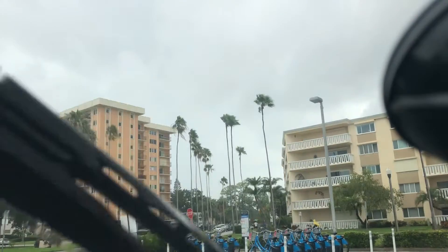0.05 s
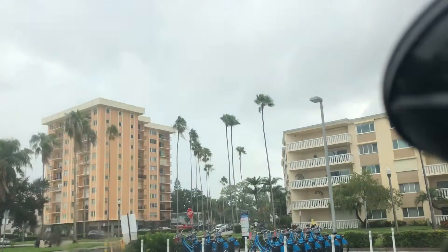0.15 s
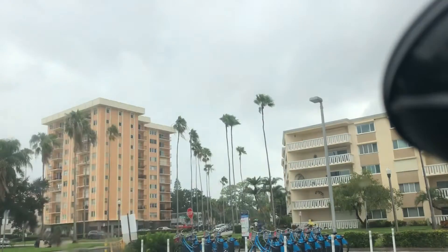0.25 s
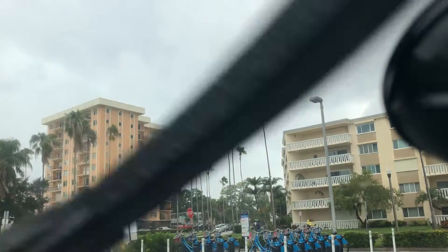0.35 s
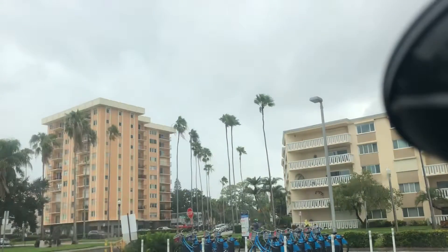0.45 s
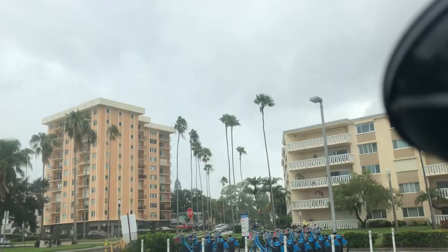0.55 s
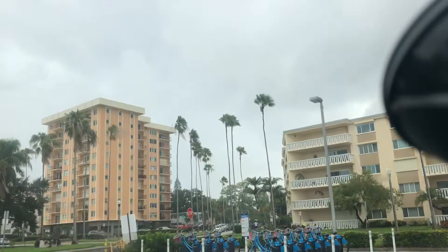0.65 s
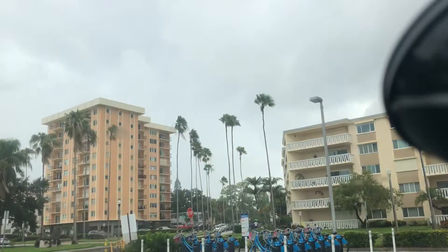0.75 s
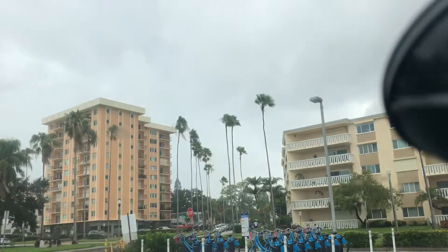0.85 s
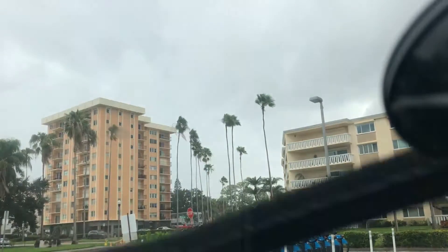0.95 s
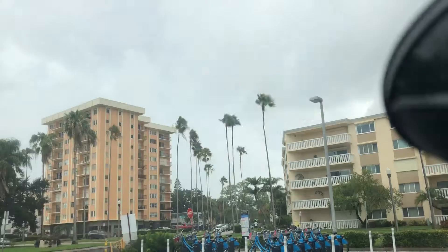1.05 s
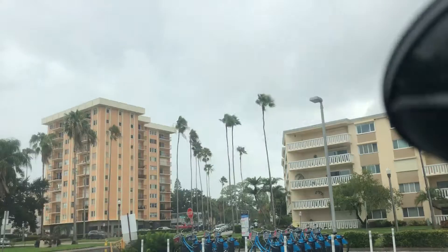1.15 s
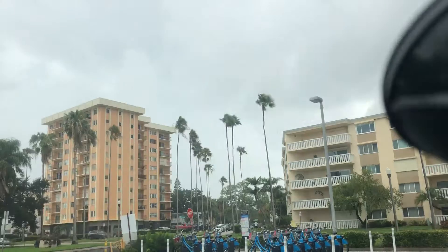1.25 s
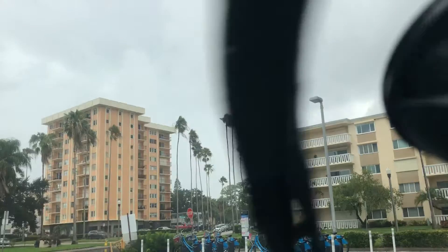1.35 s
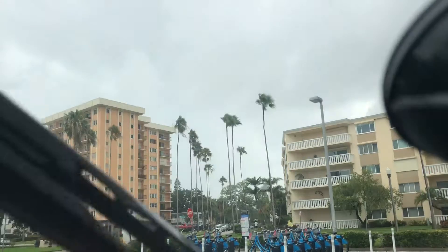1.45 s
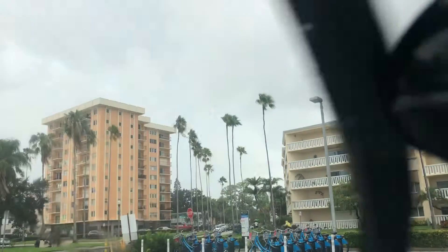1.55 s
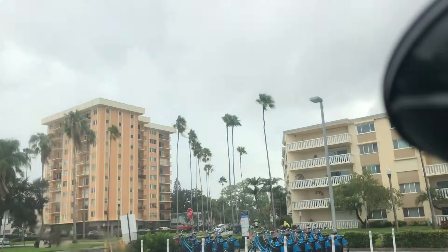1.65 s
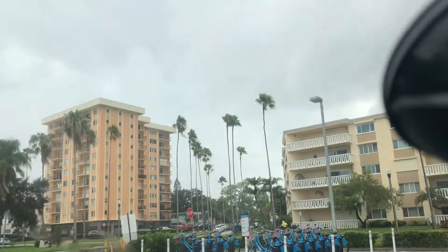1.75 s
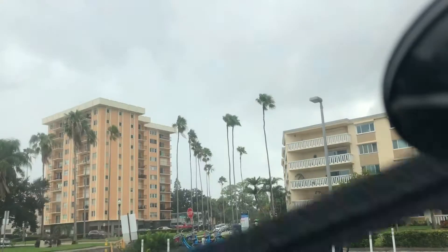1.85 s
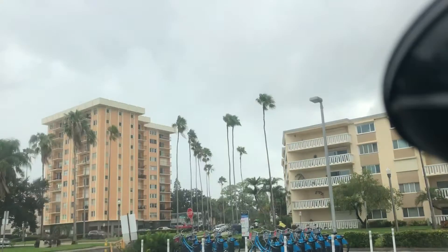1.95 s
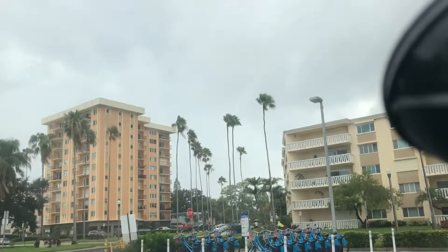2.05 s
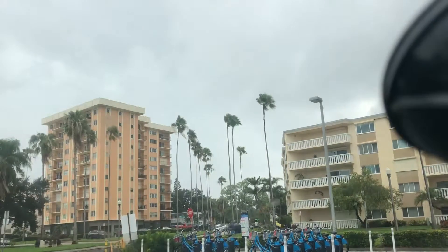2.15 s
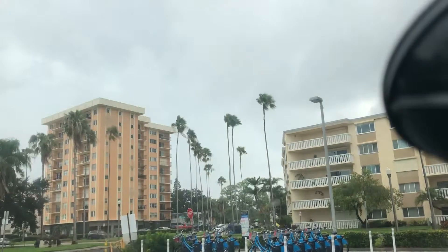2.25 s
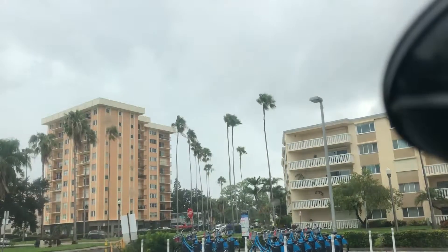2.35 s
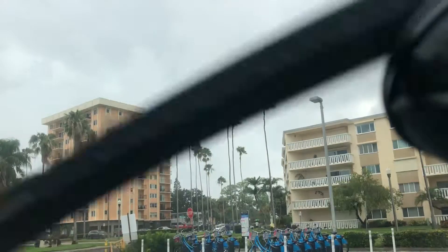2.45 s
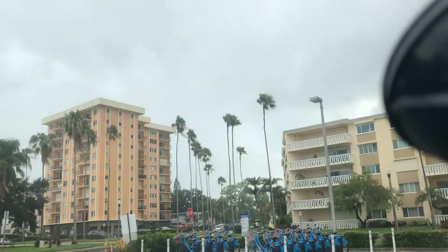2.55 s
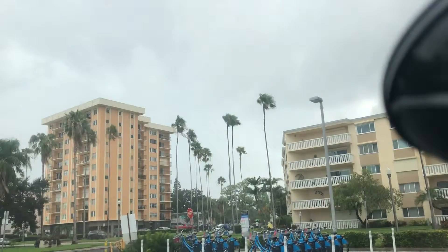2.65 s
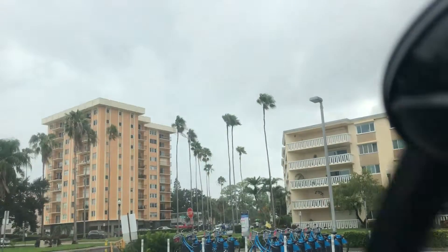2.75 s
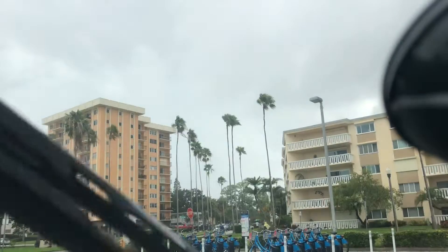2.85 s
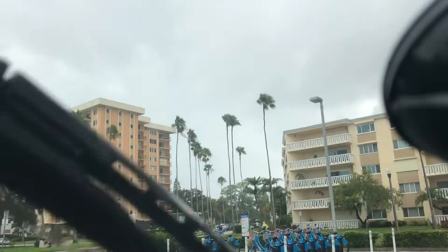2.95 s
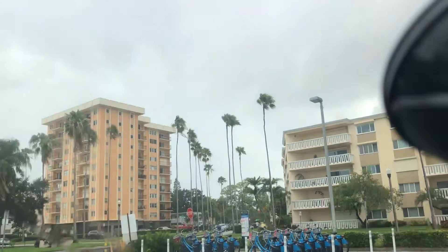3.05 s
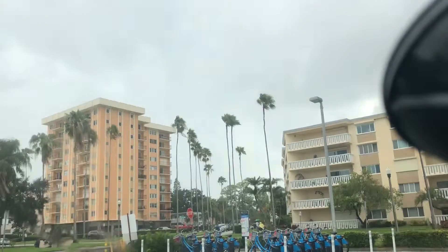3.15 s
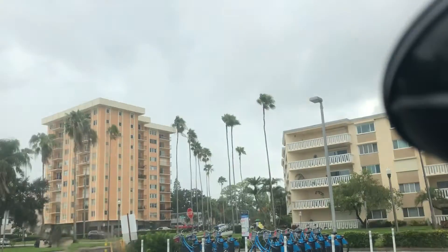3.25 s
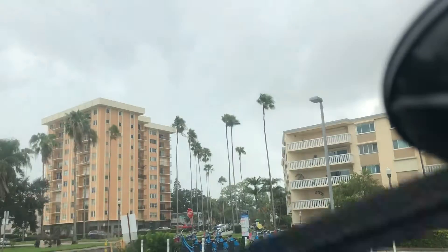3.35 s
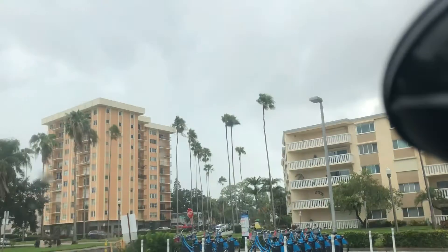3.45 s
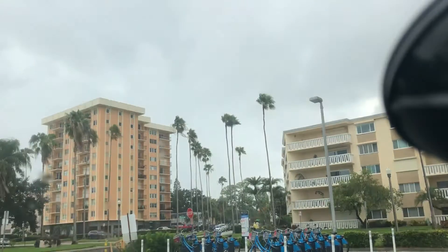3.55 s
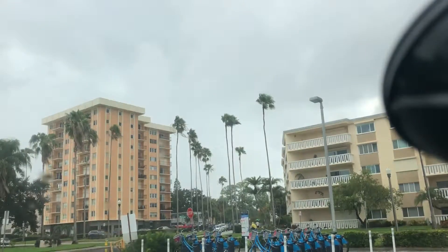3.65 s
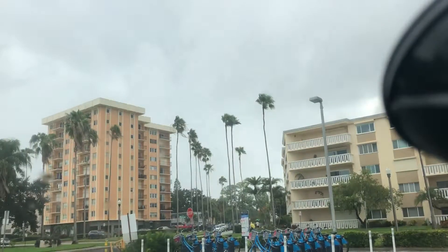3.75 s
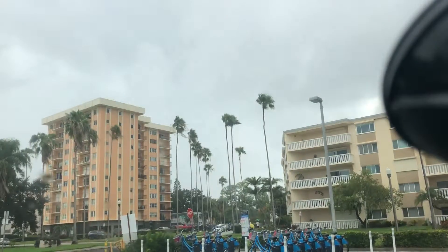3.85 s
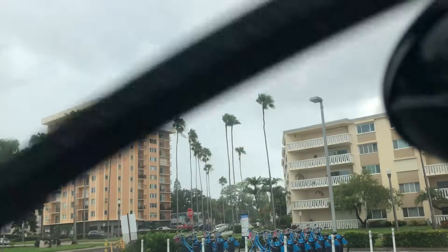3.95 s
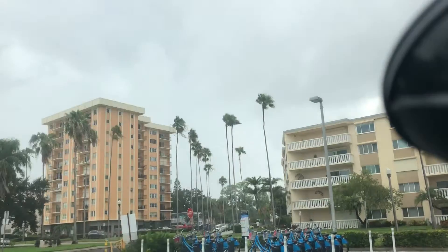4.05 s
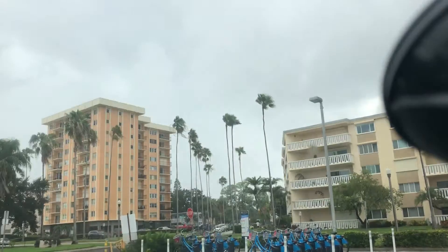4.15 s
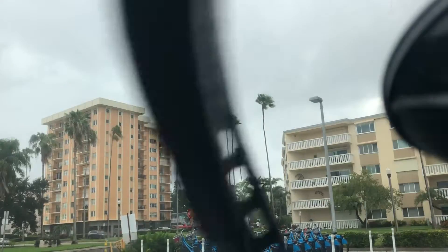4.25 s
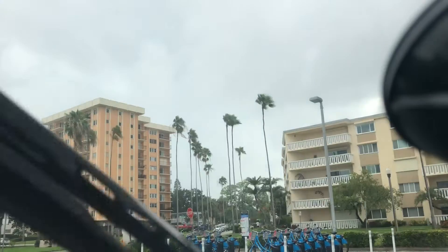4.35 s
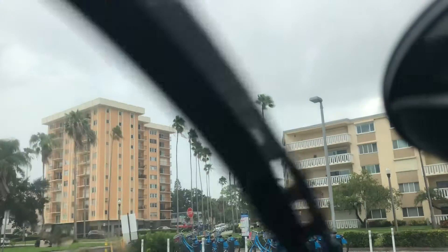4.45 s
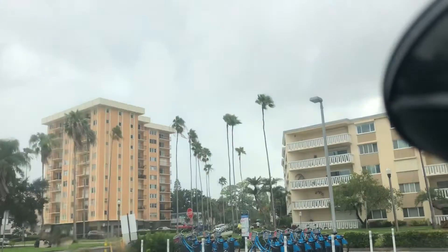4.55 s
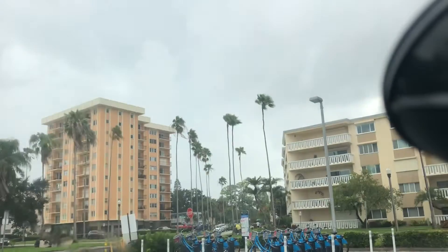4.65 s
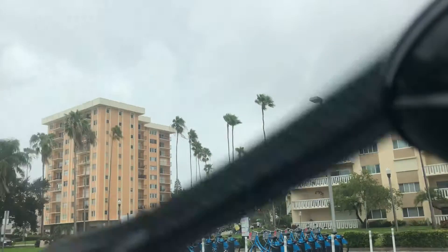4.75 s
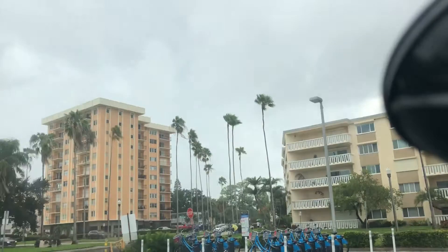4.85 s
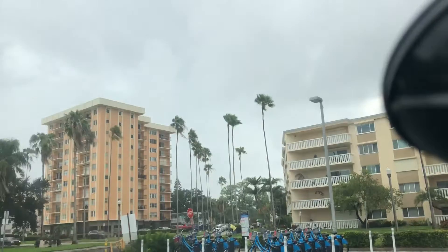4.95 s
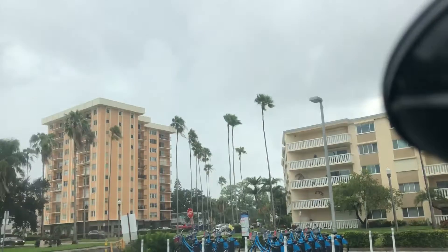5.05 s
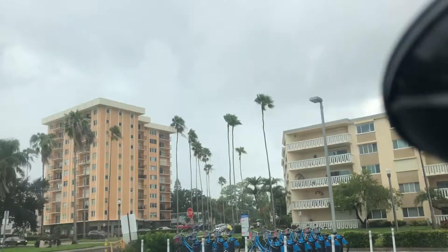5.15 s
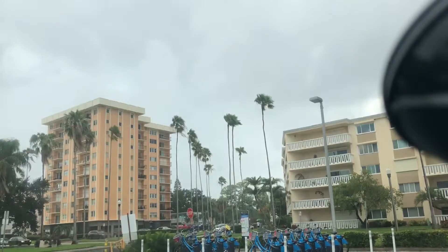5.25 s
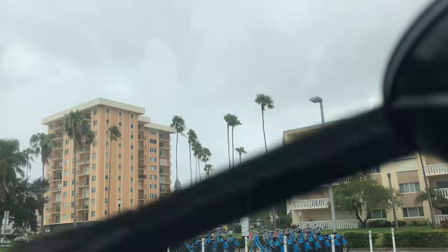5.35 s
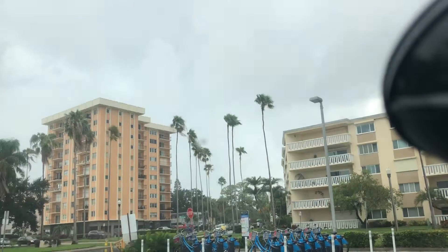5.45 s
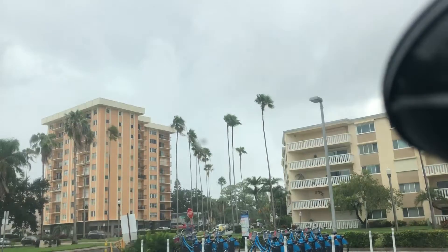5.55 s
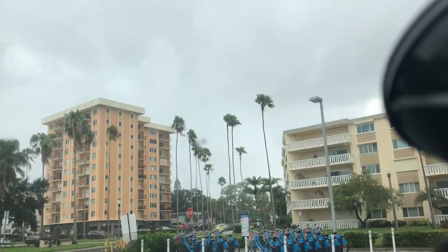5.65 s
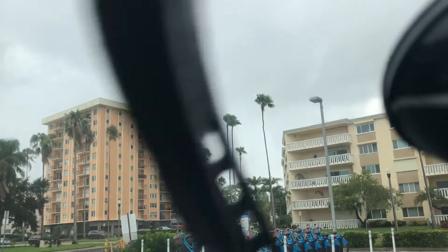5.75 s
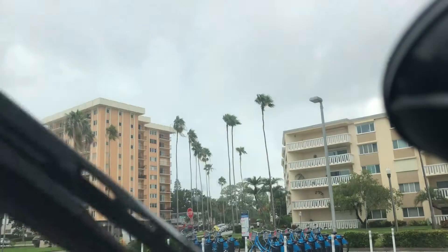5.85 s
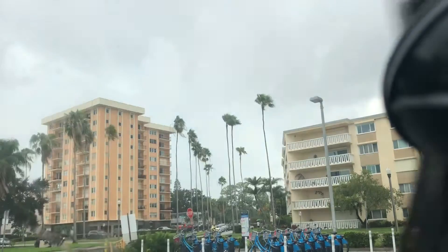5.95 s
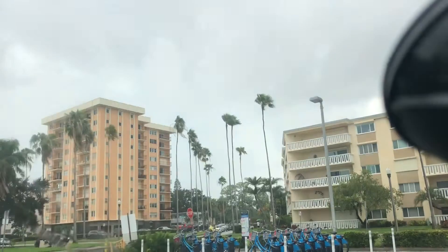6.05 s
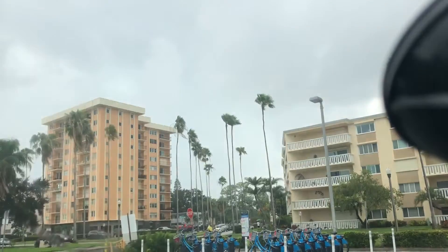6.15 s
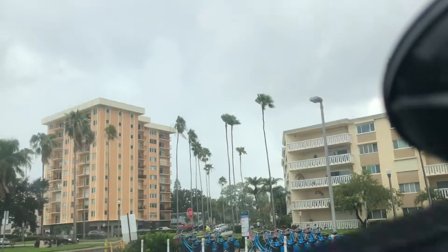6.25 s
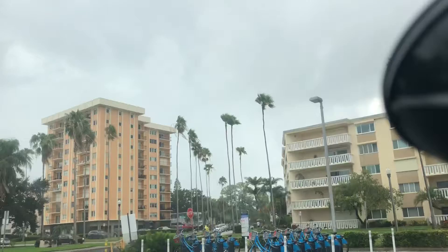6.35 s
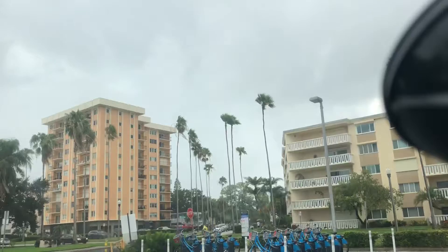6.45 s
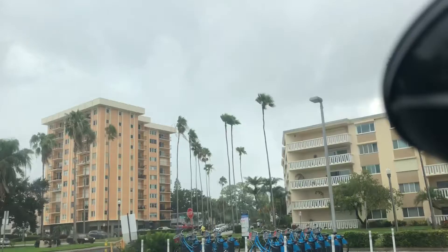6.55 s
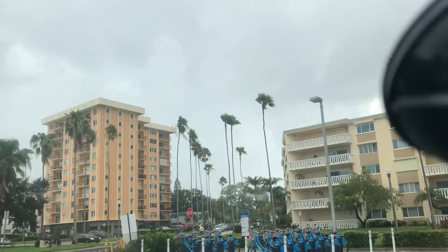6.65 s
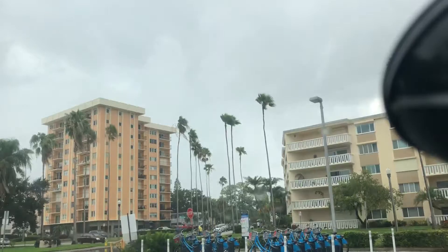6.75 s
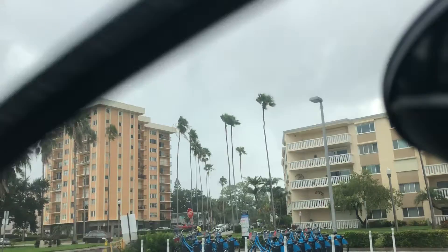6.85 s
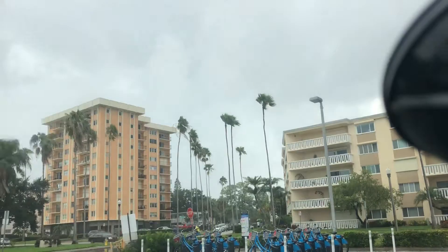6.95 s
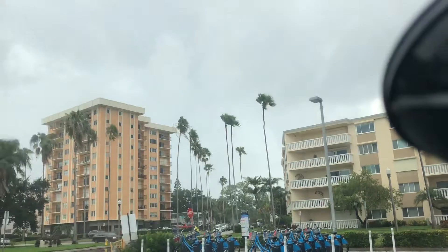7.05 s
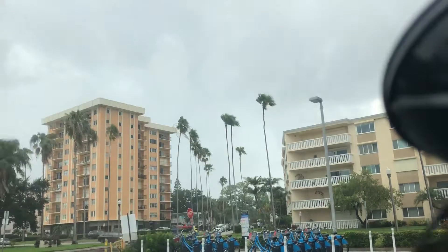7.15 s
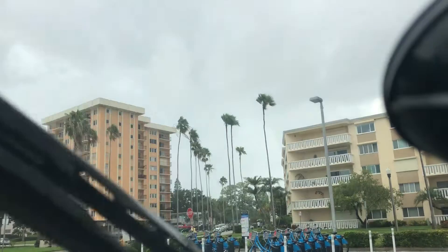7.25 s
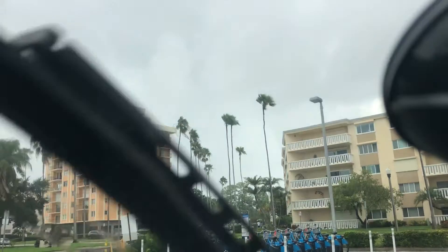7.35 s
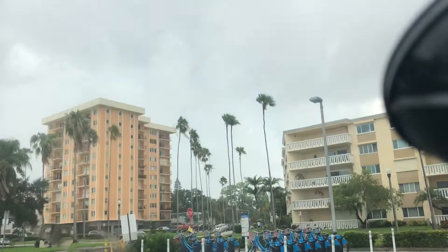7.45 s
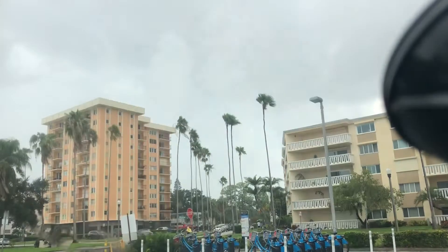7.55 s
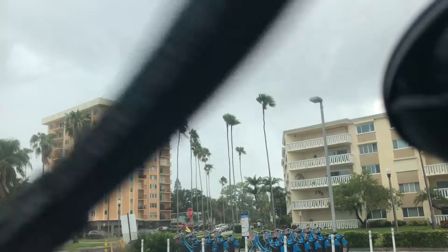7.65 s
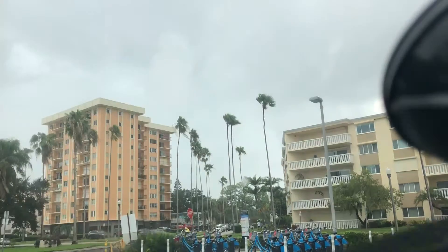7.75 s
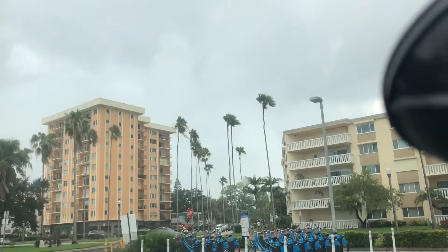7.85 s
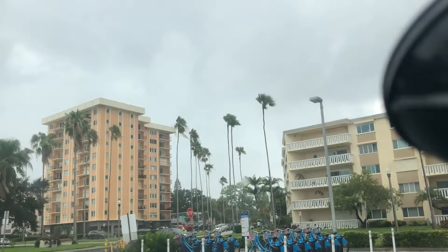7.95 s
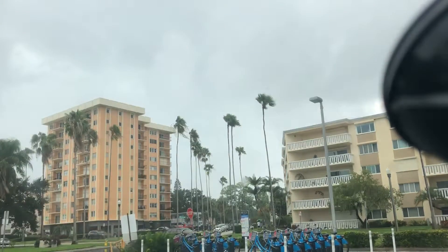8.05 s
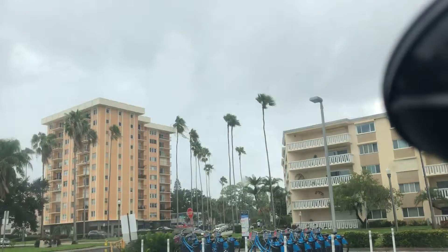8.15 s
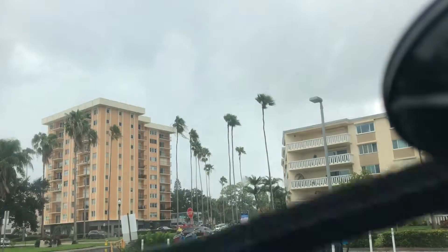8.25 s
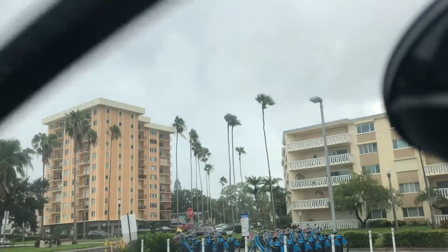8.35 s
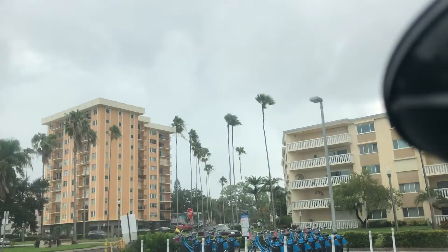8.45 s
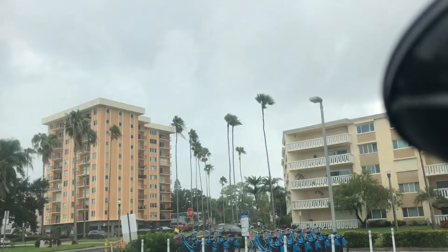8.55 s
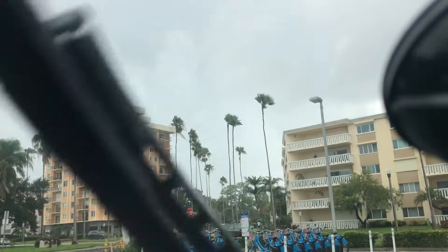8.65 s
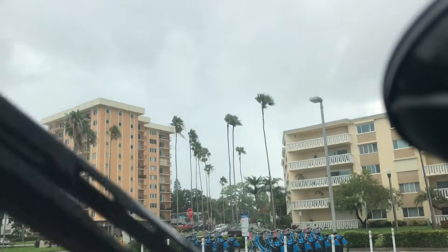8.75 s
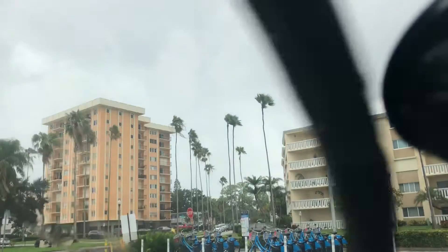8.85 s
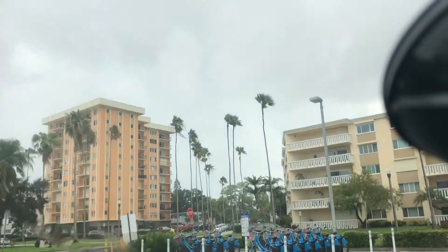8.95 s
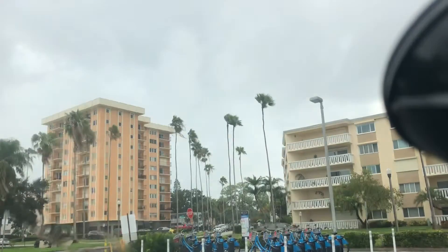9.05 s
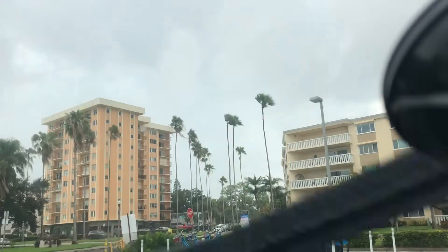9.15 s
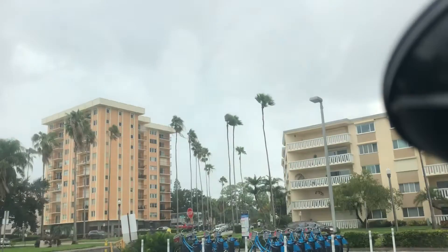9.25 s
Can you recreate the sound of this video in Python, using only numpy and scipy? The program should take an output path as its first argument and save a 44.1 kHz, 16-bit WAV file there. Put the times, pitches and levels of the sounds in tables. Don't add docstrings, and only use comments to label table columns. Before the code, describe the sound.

Heard from inside a parked car on a phone microphone: fast wipers turn at each end of their sweep. A soft rubber flip leads into a heavy, hollow low knock, then a lighter knock follows with squeaky stuttering judder and a small click. The pair repeats about every one and a half seconds over engine rumble, faint blower hiss and light drizzle.

```python
import sys
import numpy as np
from scipy import signal
from scipy.fft import rfft, irfft
from scipy.io import wavfile
from scipy.ndimage import uniform_filter1d

SR = 44100
rng = np.random.default_rng(int(sys.argv[2]) if len(sys.argv) > 2 else 0)


def dump_mix(stems):
    frames = np.atleast_2d(stems).T
    limited = np.clip(frames, -1, 1)
    pcm = np.round(limited * 32767).astype(np.int16)
    wavfile.write(sys.argv[1], SR, pcm)


def invert_db(x):
    u = np.asarray(x, float) / 20
    return 10 ** u


N = 410130

# pitch_hz, density_db_per_hz
CABIN_SPECTRUM = [(12, -36), (20, -2), (81, 0), (120, -2.5), (198, -5.5), (247, -7.5), (318, -12.5),
                  (587, -41.5), (639, -21.5), (734, -22.5), (918, -23.5), (1180, -30), (3050, -32),
                  (6860, -42), (15900, -69.5)]
# pitch_hz, width_hz, level_db
MOTOR_PANELS = [
    (36.3, 7.7, -52.5),
    (76.1, 19, -55),
    (200.7, 16, -53.5),
    (332, 31, -64),
    (618, 59, -65),
    (878, 100, -67),
    (9000, 980, -85.5),
]
# time_s, flow_db, drizzle_db
WEATHER = [(0, .4, 5), (.5, 0.9, -1), (1.6, -0.4, 6), (2.1, -0.5, 2), (2.6, -0.5, 6), (3.8, -0.3, 1.5),
           (4.9, 0, -1), (6.0, 0.9, 0.5), (7.2, 2, -2), (7.8, 1.3, -5), (8.6, 0.6, -3), (9.3, -0.1, -3)]
# start_s, level_db
DROPS = [
    (2.556, -54),
    (2.7595, -61),
    (3.9694, -56),
    (7.737, -48),
    (9.203, -45),
]

# start_s, blow_db
HEAVY_KNOCKS = [
    (0.1162, 0),
    (1.582, 0),
    (3.0446, 1),
    (4.5051, 1),
    (5.9652, -1),
    (7.4272, 1),
    (8.8866, 2),
]
# start_s, blow_db
LIGHT_KNOCKS = [
    (0.7347, 0),
    (2.1977, 0),
    (3.6581, 0),
    (5.1183, 0),
    (6.5799, 0),
    (8.0404, 0),
]
# start_s, snap_db
LEAD_SNAPS = [
    (0.0138, -37.5),
    (1.4787, -36),
    (2.9389, -35),
    (4.3983, -34.5),
    (5.8641, -35),
    (7.3211, -35),
    (8.7803, -34.5),
]
# start_s, snap_db
TRAIL_SNAPS = [
    (0.854, -32),
    (2.3145, -35.5),
    (3.7756, -33),
    (5.236, -35),
    (6.6984, -34),
    (8.158, -32),
]
# start_s, blow_db
FLIPS = [
    (0.0227, 3),
    (1.4876, 0.5),
    (2.9489, 1),
    (4.4092, 0),
    (5.8728, 0.5),
    (7.3317, 0),
    (8.7909, 1.5),
]
# start_s, level_db
LATCH_CLICKS = [
    (0.8704, -36),
    (2.3346, -52),
    (3.7948, -40),
    (5.2565, -40),
    (6.7176, -39),
    (8.1768, -42),
]
# start_s, level_db
CREAKS = [(1.417, -57), (2.878, -53), (4.3374, -58), (5.1476, -53), (5.8024, -57), (6.6094, -53),
          (7.2594, -57), (8.72, -58)]

# pitch_hz, level_db, t60_s, swing_sign (+1 out, -1 in)
HEAVY_MODES = [(46.2, -32.4, 0.33, 1), (82.5, -27.8, 0.33, -1), (90.5, -30.7, 0.33, 1),
               (114.4, -17.5, 0.33, 1), (142.4, -20.5, 0.278, 1), (170.6, -17.5, 0.184, -1),
               (197.4, -28.8, 0.279, -1), (216.0, -11.2, 0.044, 1), (241.8, -7.9, 0.07, 1),
               (285.1, -15.0, 0.09, 1), (310.1, -7.4, 0.04, -1), (334.4, -23.7, 0.105, 1),
               (489.5, -27.6, 0.043, 1), (583.4, -26.2, 0.057, 1)]
LIGHT_MODES = [(40.7, -42, 0.33, 1), (82, -30, 0.37, 1), (129, -30.5, 0.32, 1), (154.6, -34, 0.59, 1),
               (181.1, -20.5, 0.14, -1), (210, -29.0, 0.37, -1), (239.7, -26.5, 0.15, 1),
               (293, -34.5, 0.25, 1), (333, -35.5, 0.23, -1), (412, -32, 0.069, 1), (469, -36.5, 0.075, -1),
               (526, -28.5, 0.023, 1)]
FLIP_MODES = [(49.5, -26.2, 0.02, 1), (88.6, -30.1, 0.3, -1), (115.2, -30.5, 0.3, -1),
              (133.4, -24.5, 0.189, 1), (156.2, -28.7, 0.162, -1), (180.0, -35.2, 0.103, 1),
              (240.9, -30.7, 0.087, 1), (256.5, -33.0, 0.103, 1), (304.5, -42.0, 0.179, -1),
              (383.2, -30.1, 0.039, 1), (551.7, -70.1, 0.3, -1)]
# pitch_hz, level_db, t60_s, swing_sign
DOOR_MODES = [
    (118, -33.5, .7, -1),
    (93, -35, .5, -1),
]

# delay_s, length_s, pitch_hz, width_hz, level_db
HEAVY_RUBS = [(-.042, 0.051, 3200, 1400, -57.5), (-.038, 0.051, 610, 480, -44.5),
              (-.007, 0.012, 5000, 6500, -56), (-.005, 0.013, 2200, 1300, -46),
              (-.006, 0.024, 4700, 1500, -52.5), (-.003, 0.02, 9500, 790, -67),
              (-.008, 0.027, 910, 317, -45.5), (-.005, .011, 1370, 420, -50.5),
              (-.002, 0.054, 397, 220, -41), (0.019, 0.08, 570, 60, -56)]
LEAD_RUBS = [(-.033, 0.03, 4270, 1000, -49.5), (-0.034, 0.041, 5120, 310, -54),
             (-.025, 0.013, 8500, 6800, -59), (-.003, 0.0098, 4080, 1200, -43),
             (0.0059, .007, 9300, 2600, -62), (.004, 0.044, 4380, 950, -56.5),
             (0.019, 0.017, 5300, 600, -53.5), (.011, .028, 7400, 6800, -57.5),
             (-0.0098, 0.055, 3850, 2400, -53), (.008, 0.034, 1950, 950, -57),
             (.005, 0.031, 560, 400, -47.5), (-.062, 0.036, 390, 360, -50), (-.045, 0.061, 145, 80, -43.5),
             (-.032, 0.053, 770, 390, -54.5), (-0.021, 0.0089, 2130, 900, -56),
             (.032, 0.035, 290, 320, -51.5)]
LIGHT_RUBS = [(-.011, 0.01, 4700, 7300, -48.5), (-.007, 0.012, 4720, 1150, -44),
              (-.007, 0.018, 2500, 7200, -54.5), (-0.0051, 0.025, 3500, 2500, -54),
              (0.003, .008, 8200, 3000, -76), (-.010, 0.021, 670, 530, -42.5),
              (0.0015, 0.063, 354, 290, -45), (-.006, 0.0068, 2100, 1200, -47.5)]
TRAIL_RUBS = [(-.037, 0.018, 4570, 560, -56.5), (-.020, 0.014, 4420, 630, -52),
              (-0.038, 0.03, 3760, 820, -54.5), (-.039, 0.05, 3500, 2000, -54),
              (-.032, 0.029, 1330, 150, -45.5), (-.005, 0.016, 1430, 400, -51.5),
              (-0.041, 0.035, 550, 490, -40), (-.039, 0.08, 314, 200, -34), (-.002, .013, 3530, 1100, -41),
              (.008, 0.02, 2760, 1400, -52)]
LATCH_RUBS = [
    (-.0005, .0035, 4800, 4200, -46),
    (-.0005, .004, 13500, 1200, -65),
    (-.005, .013, 820, 260, -38),
    (.002, .015, 4500, 4000, -60),
    (-.008, .04, 125, 60, -31),
]
CREAK_RUBS = [
    (-.002, 0.011, 4500, 4700, -56.5),
]

# delay_s, level_db, push_sign (+1 push, -1 pull)
HEAVY_JOLTS = [
    (-.0345, -16, 1),
    (-.0163, -12, 1),
    (-.010, -12, 1),
]
LEAD_JOLTS = [
    (-.0598, -14, -1),
    (-.035, -19, 1),
    (-.0193, -19, -1),
]
TRAIL_JOLTS = [
    (-.0383, -12, -1),
    (-.0341, -13, -1),
    (-.0171, -6.6, 1),
    (-.0085, -10.4, 1),
    (.0005, -3, 1),
    (.0083, -11, 1),
    (.017, -9, 1),
    (.0288, -5.4, -1),
    (.0345, -12.3, -1),
]


def add(track, start_s, sound):
    at = int(round(start_s * SR)) + np.arange(len(sound))
    inside = (at >= 0) & (at < N)
    track[at[inside]] += sound[inside]


def band(size, pitch_hz, width_hz, order=2):
    f_hz = np.arange(size // 2 + 1) * SR / size + 1e-9
    detune = (f_hz - pitch_hz * pitch_hz / f_hz) / width_hz
    gain = 1 / (1 + detune ** 2) ** (order / 2)
    noise = irfft(rfft(rng.standard_normal(size)) * gain, size)
    return noise / np.std(noise)


def walk(rate_hz):
    hold = int(SR / rate_hz)
    held = np.repeat(rng.standard_normal(N // hold + 1), hold)
    smooth = uniform_filter1d(uniform_filter1d(held, hold), hold)
    return 1.3 * smooth[:N]


def shudder(events, swell_db, rise_s, fall_s):
    since_s = np.arange(N) / SR - np.array(events)[:, :1]
    climb = np.clip(1 + since_s / rise_s, 0, 1)
    fall = np.exp(-np.maximum(since_s, 0) / fall_s)
    return swell_db * np.sum(climb * fall, axis=0)


def motor_hum():
    out = np.zeros(N)
    for pitch_hz, width_hz, level_db in MOTOR_PANELS:
        out += invert_db(level_db + 1.7 * walk(4.7)) * band(N, pitch_hz, width_hz)
    return out


def cabin_noise():
    time_s, flow_db, drizzle_db = np.transpose(WEATHER)
    now_s = np.arange(N) / SR
    hiss_db = np.interp(now_s, time_s, flow_db)
    spray_db = np.interp(now_s, time_s, drizzle_db)
    rumble_db = -2.5 + shudder(HEAVY_KNOCKS, swell_db=3.8, rise_s=0.15, fall_s=0.064)
    rumble_db += shudder(TRAIL_SNAPS, swell_db=8.1, rise_s=0.072, fall_s=0.068)
    spectrum_hz, density_db = np.transpose(CABIN_SPECTRUM)
    out = np.zeros(N)
    for hz in 28 * 2 ** np.arange(0, 9.6, .5):
        high = np.clip(np.log2(hz / 250) / 2, 0, 1)
        air_db = hiss_db if hz < 9500 else spray_db
        level_db = np.interp(np.log(hz), np.log(spectrum_hz), density_db) + 10 * np.log10(hz) - 68
        level_db = level_db + (1 - high) * rumble_db + high * air_db
        level_db = level_db + (1.8 - 0.94 * high) * walk(11)
        out += invert_db(level_db) * band(N, hz, hz / 1.61)
    return out


def raindrops():
    out = np.zeros(N)
    decay = np.exp(-np.arange(1024) / SR / 0.0034)
    for start_s, level_db in DROPS:
        add(out, start_s, invert_db(level_db - 13) * decay * band(1024, 11500, 8000))
    return out


def ring(modes, damping=1, bloom_s=.001):
    pitch_hz, level_db, t60_s, swing = np.transpose(modes)
    t_s = np.arange(SR // 2)[:, None] / SR
    rise_s = np.where(pitch_hz < 150, bloom_s, .001)
    contact = 1 - np.exp(-t_s / rise_s)
    decay = np.exp(-np.log(1000) * damping * t_s / t60_s)
    return swing * invert_db(level_db) * np.sin(2 * np.pi * pitch_hz * t_s) * decay * contact


def knocks(events, modes, scatter_db, bloom_s=.001):
    out = np.zeros(N)
    rings = ring(modes, 0.98, bloom_s)
    for start_s, blow_db in events:
        strength = invert_db(scatter_db * rng.standard_normal(len(modes)))
        add(out, start_s, invert_db(blow_db) * rings @ strength)
    return out


def squeak(length_s, pitch_hz, width_hz):
    u = np.arange(4096) / SR / length_s
    swell = np.sin(np.pi / 2 * np.clip(u / .4, 0, 1)) ** 2
    fall = np.cos(np.pi / 2 * np.clip(u, 0, 1) ** 2)
    shape = swell * (fall + 0.29 * np.exp(-u))
    grain_db = 3.7 * uniform_filter1d(np.repeat(rng.standard_normal(128), 32), size=24)
    rub = shape * invert_db(grain_db) * band(4096, pitch_hz, 1.43 * width_hz, order=4)
    return rub * np.sqrt(np.sum(shape ** 2) / np.sum(rub ** 2))


def squeaks(events, rubs, usual_db, follow=.6):
    out = np.zeros(N)
    for start_s, event_db in events:
        for delay_s, length_s, pitch_hz, width_hz, rub_db in rubs:
            late, loud, bend = rng.standard_normal(3)
            rub = squeak(length_s, pitch_hz * (1 + .025 * bend), width_hz)
            level_db = rub_db + follow * (event_db - usual_db) + 1.5 * loud
            add(out, start_s + delay_s + .001 * late, invert_db(level_db) * rub)
    return out


def judder(events, jolts, gain_db, bright_db_per_octave):
    out = np.zeros(N)
    rings = ring(LIGHT_MODES, 1.42)
    octaves = np.log2(np.array(LIGHT_MODES)[:, 0] / 200)
    for start_s, _ in events:
        for delay_s, jolt_db, push in jolts:
            late = rng.standard_normal()
            scatter_db = 2.0 * rng.standard_normal(len(octaves))
            pull = push * invert_db(jolt_db + gain_db + bright_db_per_octave * octaves + scatter_db)
            slip_s = .0004 * late * (1 + 2 * (delay_s > 0))
            add(out, start_s + delay_s + slip_s, rings @ pull)
    return out


def wipers():
    out = knocks(HEAVY_KNOCKS, HEAVY_MODES, 1.0, bloom_s=.012)
    out += knocks(LIGHT_KNOCKS, LIGHT_MODES, 1.0, bloom_s=.012)
    out += knocks(FLIPS, FLIP_MODES, 1.0)
    out += knocks([(start_s, 0) for start_s, _ in LATCH_CLICKS], DOOR_MODES, 1.5)

    out += squeaks(HEAVY_KNOCKS, HEAVY_RUBS, usual_db=0)
    out += squeaks(LIGHT_KNOCKS, LIGHT_RUBS, usual_db=0)
    out += squeaks(LEAD_SNAPS, LEAD_RUBS, usual_db=-37.5)
    out += squeaks(TRAIL_SNAPS, TRAIL_RUBS, usual_db=-37.5)
    out += squeaks(LATCH_CLICKS, LATCH_RUBS, usual_db=-40, follow=.9)
    out += squeaks(CREAKS, CREAK_RUBS, usual_db=-48, follow=.9)

    out += judder(HEAVY_KNOCKS, HEAVY_JOLTS, gain_db=.3, bright_db_per_octave=8.0)
    out += judder(FLIPS, LEAD_JOLTS, gain_db=.3, bright_db_per_octave=0.35)
    out += judder(TRAIL_SNAPS, TRAIL_JOLTS, gain_db=2.8, bright_db_per_octave=1.8)
    return out


def scene():
    mix = motor_hum() + cabin_noise() + raindrops() + wipers()
    return mix[None]


def band_limit(x):
    return signal.sosfilt(signal.butter(12, 15840, fs=SR, output="sos"), x)


def record(dry):
    low_cut = signal.butter(3, 25, "high", fs=SR, output="sos")
    top_cut = signal.ellip(10, .2, 70, 15950, fs=SR, output="sos")
    x = signal.sosfiltfilt(low_cut, dry)
    x = np.tanh(1.3 * x) / 1.3
    x = signal.sosfilt(top_cut, x)
    return band_limit(x)


dry = scene()
out = record(dry)
dump_mix(out)
```